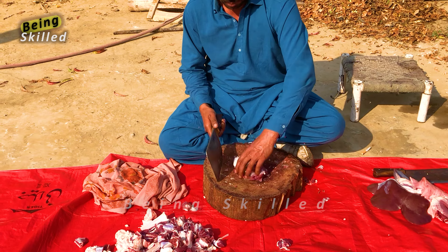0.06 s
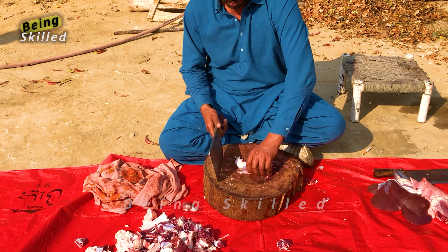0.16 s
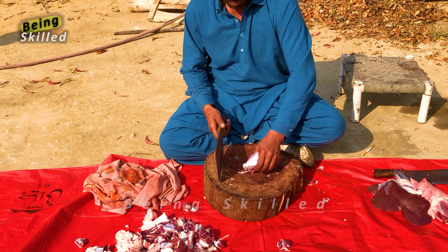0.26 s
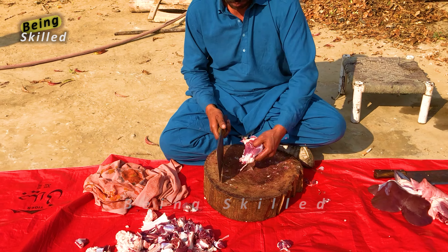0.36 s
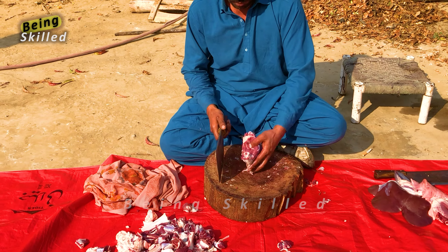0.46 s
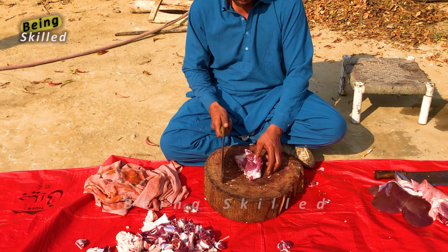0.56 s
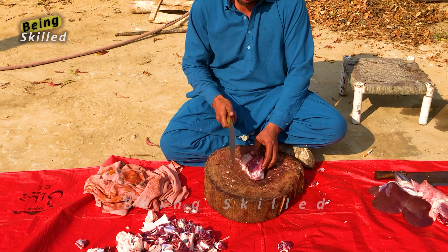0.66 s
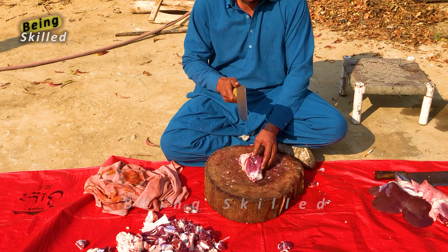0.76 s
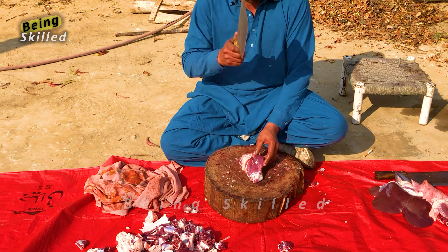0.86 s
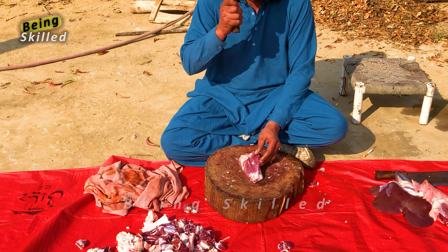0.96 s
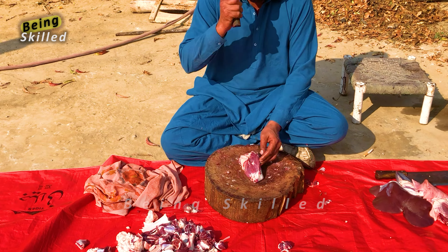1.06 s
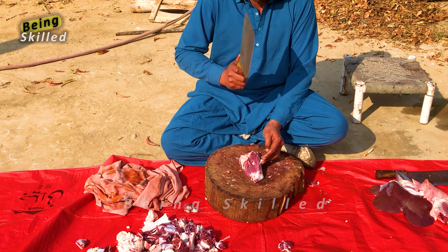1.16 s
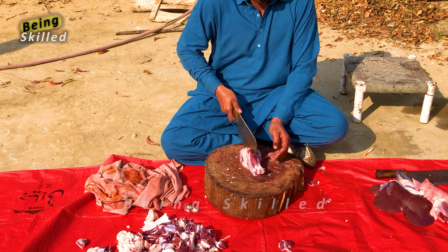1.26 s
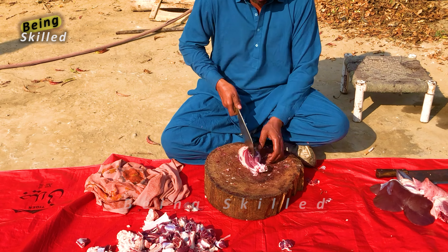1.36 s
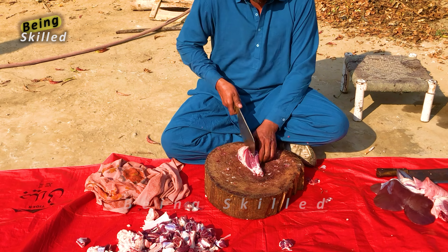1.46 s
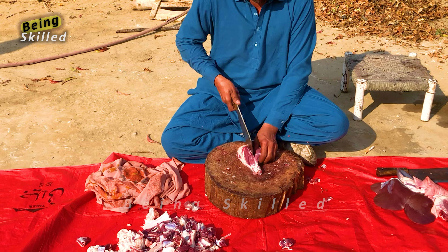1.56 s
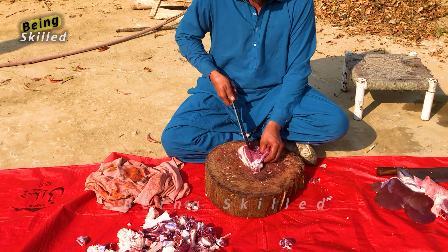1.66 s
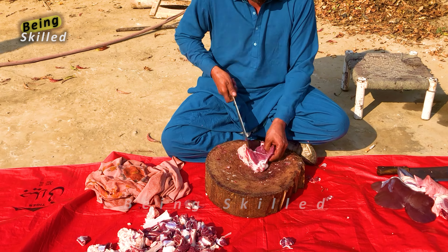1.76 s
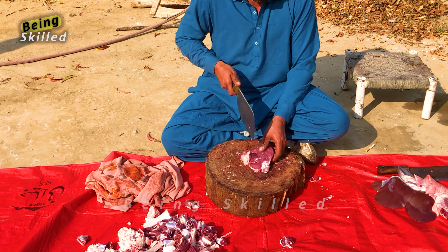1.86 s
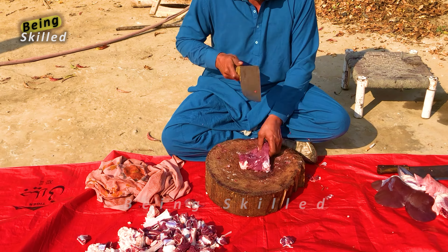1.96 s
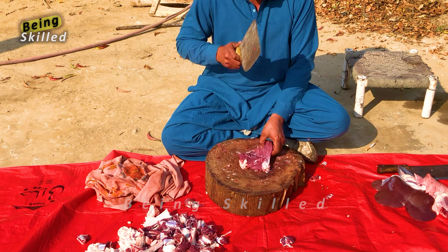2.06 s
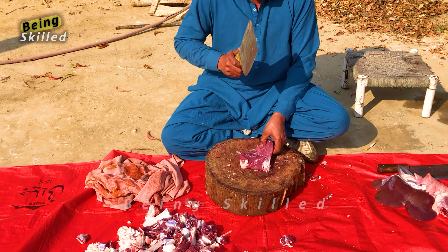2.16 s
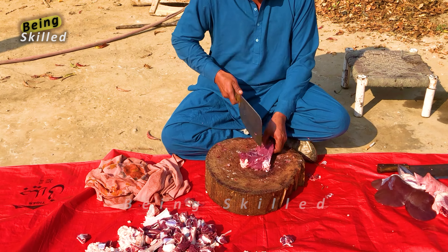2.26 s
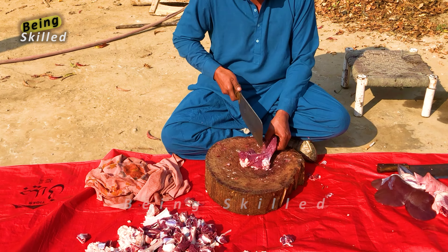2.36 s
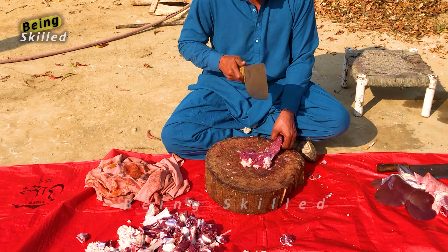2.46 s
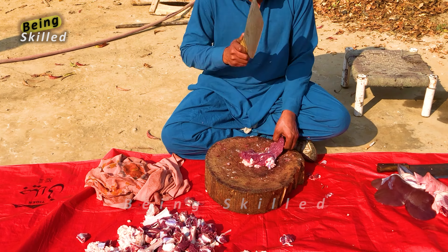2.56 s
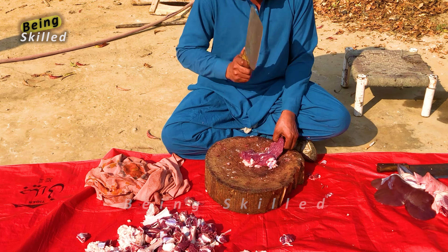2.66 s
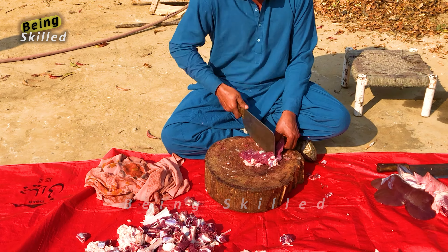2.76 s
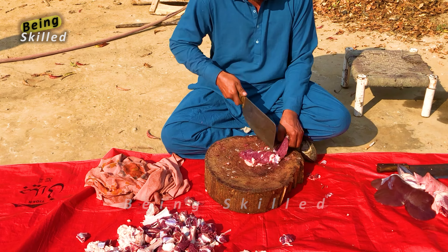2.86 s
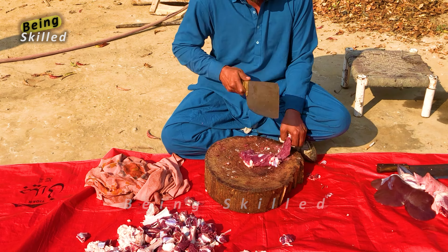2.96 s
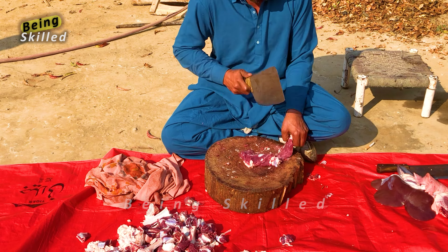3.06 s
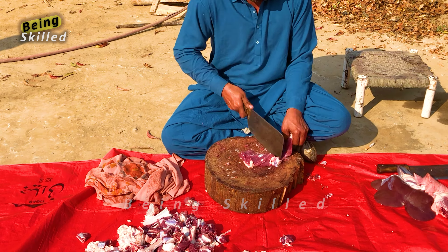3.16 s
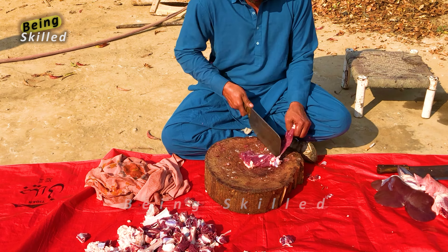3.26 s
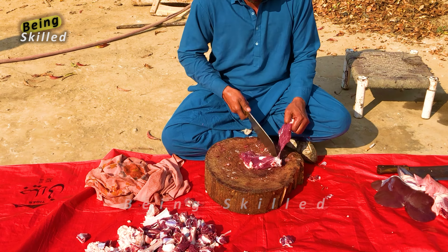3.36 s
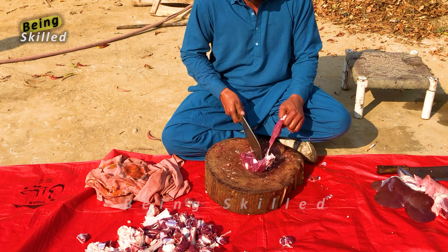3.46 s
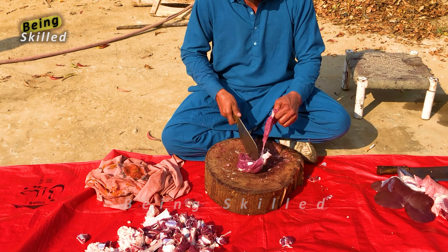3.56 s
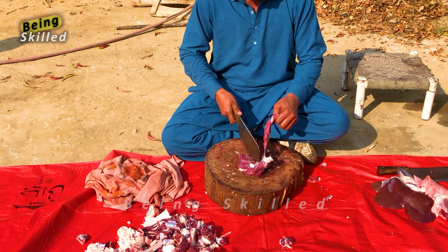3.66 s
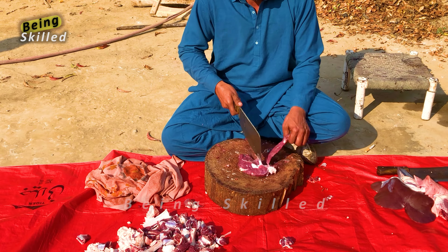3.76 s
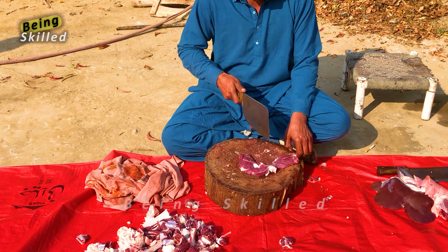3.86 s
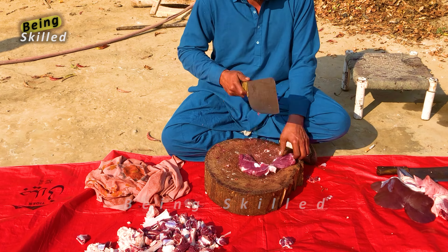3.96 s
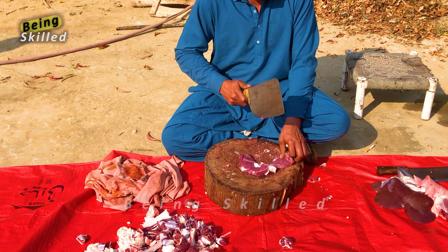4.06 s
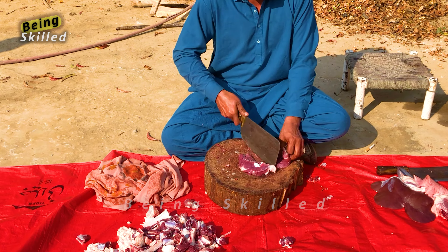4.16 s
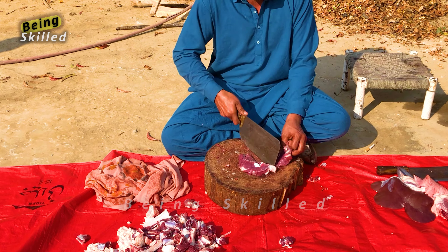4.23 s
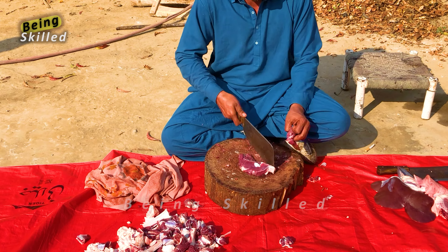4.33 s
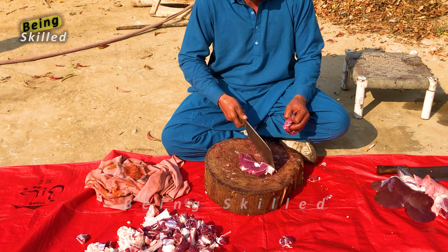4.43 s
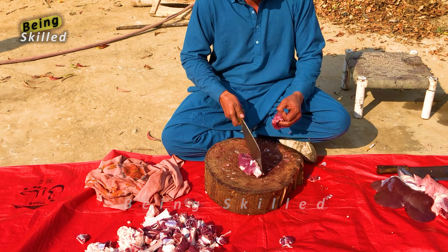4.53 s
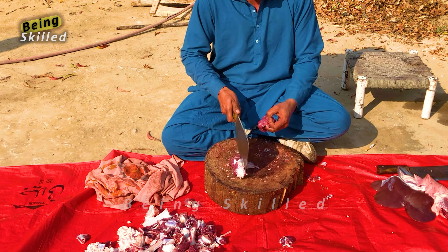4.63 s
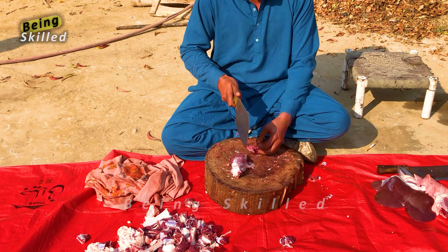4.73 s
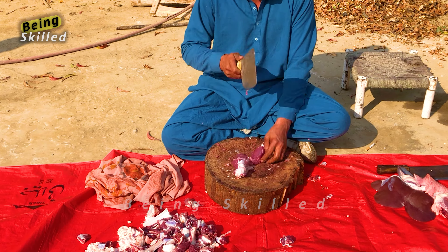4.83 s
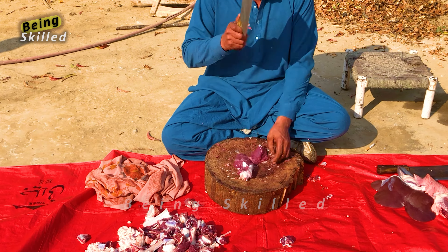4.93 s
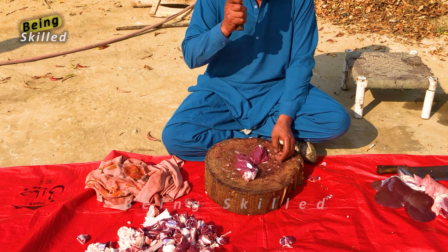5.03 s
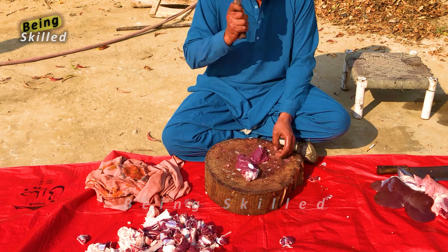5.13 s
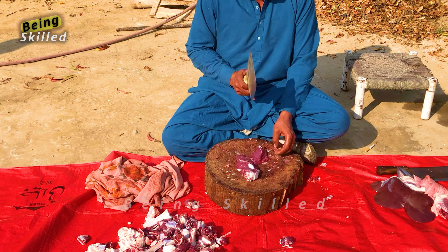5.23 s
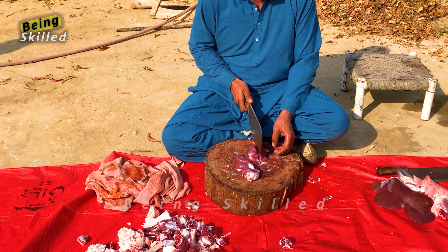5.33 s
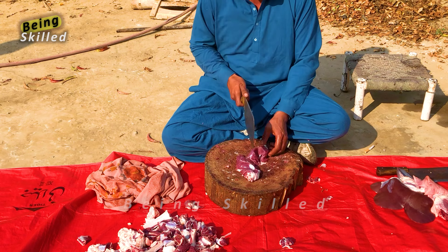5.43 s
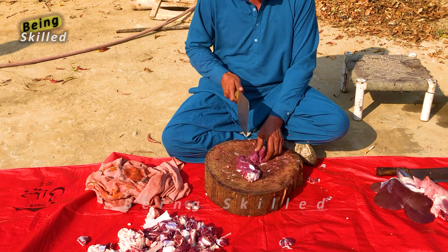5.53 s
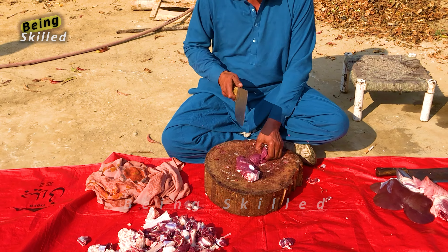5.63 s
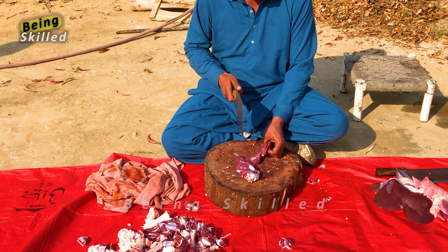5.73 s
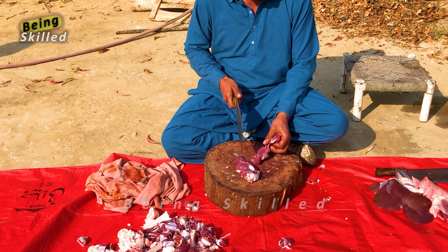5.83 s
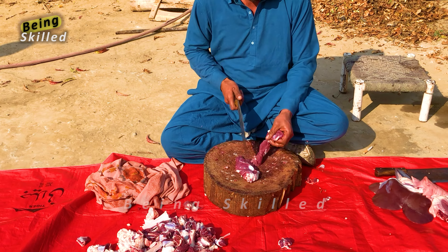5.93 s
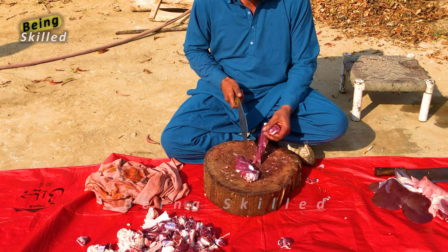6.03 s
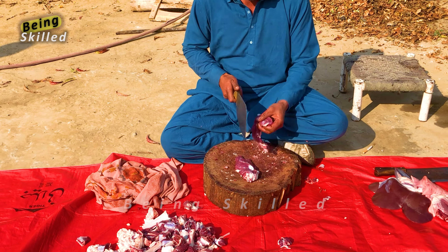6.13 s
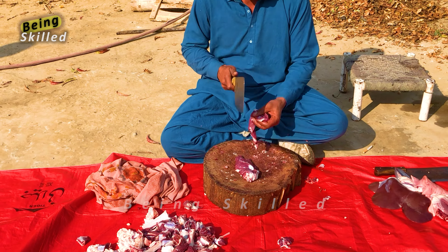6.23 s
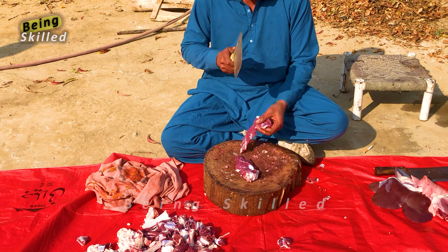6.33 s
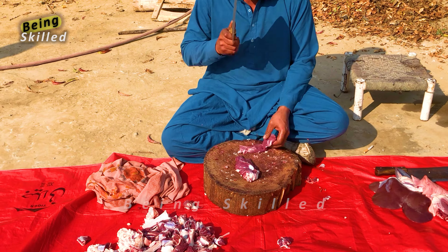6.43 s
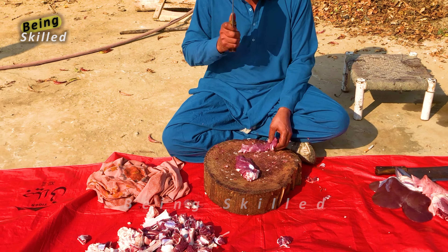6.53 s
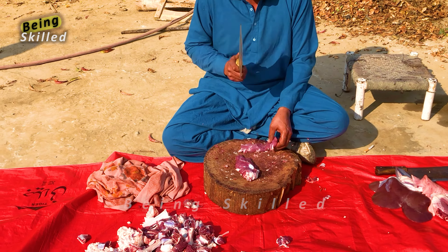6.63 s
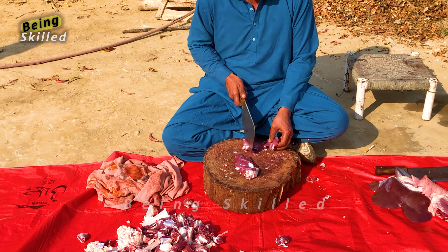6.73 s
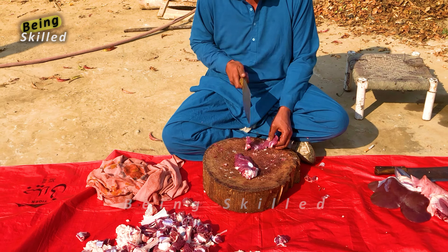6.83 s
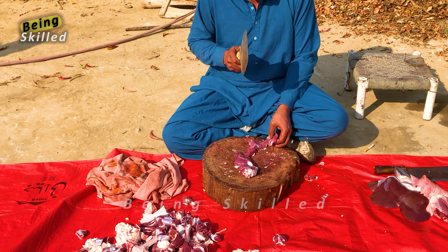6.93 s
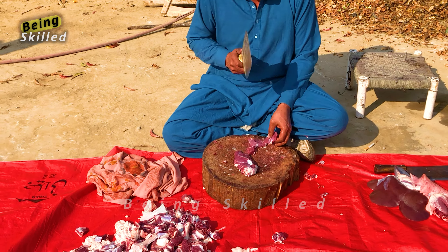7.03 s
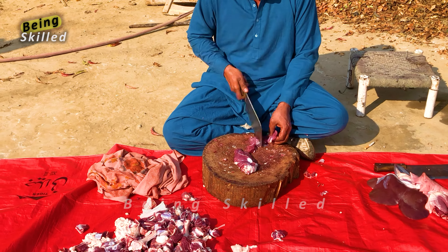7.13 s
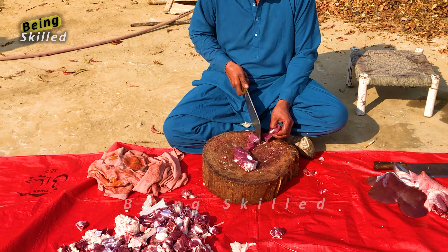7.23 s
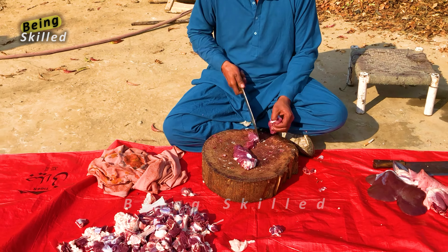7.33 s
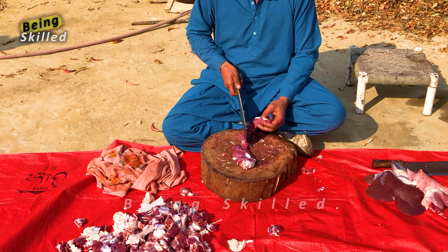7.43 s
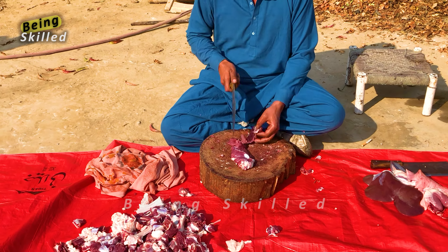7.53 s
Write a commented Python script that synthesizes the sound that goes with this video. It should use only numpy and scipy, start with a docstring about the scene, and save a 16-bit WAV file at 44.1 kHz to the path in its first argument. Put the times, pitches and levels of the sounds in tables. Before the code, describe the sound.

A cleaver strikes meat and bone on a wooden block in sharp, irregular chops, with wet handling sounds and slapping yard echoes outdoors.

```python
"""Distant traffic rumbles throughout as coloured noise, while wet meat clicks and rustles as noise grains.
Drags set the wood ringing, slides and short ticks hiss, and a far bird whistles faintly in gliding sines.
Among these, from 1.27 s on, a cleaver chops meat and bone on a round wooden block in a walled yard:
each blow knocks the block's modes, cracks as shaped noise, sets the blade's modes ringing and comes
back from the walls."""
import sys
import numpy as np
from scipy import signal
from scipy.fft import rfft, irfft
from scipy.io import wavfile
from scipy.ndimage import uniform_filter1d, minimum_filter1d

SR = 44100
rng = np.random.default_rng(int(sys.argv[2]) if len(sys.argv) > 2 else 0)


def persist_wave(psi):
    """Save psi, clipped to +-1, as 16-bit WAV."""
    counts = np.round(np.clip(psi, -1, 1) * 32767).astype(np.int16)
    wavfile.write(sys.argv[1], SR, np.atleast_2d(counts).T)


N = 334719   # length in samples

# Traffic and open air. Each row: frequency in Hz, spectral level in dB per Hz.
AIR_SPECTRUM = [(15, -24.5), (25, -9), (60, 3.5), (138, 6), (238, -4.5), (584, -13), (669, -12),
                (746, -9.5), (1090, -14), (1930, -26.5), (4860, -45.5), (9330, -42.5), (16500, -60)]
AIR_DB = -68

# Faint whistles. Each row: start in seconds, end in seconds, first and last frequency in Hz, level in dB.
WHISTLE_GLIDES = [(1.12, 1.19, 2440, 2360, -79), (1.884, 2.026, 4180, 3900, -84),
                  (1.922, 1.97, 3900, 3300, -79), (1.95, 2.1, 3320, 3250, -79),
                  (1.964, 2.084, 3650, 3500, -78), (1.946, 1.982, 1830, 2080, -78),
                  (1.97, 2.282, 2445, 2450, -73.5), (2.03, 2.134, 2640, 2530, -71),
                  (2.107, 2.315, 1394, 1260, -78), (3.57, 3.65, 2300, 1870, -73),
                  (3.798, 4.165, 3000, 2870, -82), (4.466, 4.85, 2950, 2930, -87),
                  (4.898, 5.31, 2950, 2930, -84)]

# Rustle of the meat in the fingers. Each row: time in seconds, level in dB, level of its treble in dB.
HAND_LEVELS = [(0.0, -83.5, -86.5), (0.51, -75.5, -78.5), (0.99, -81.5, -82.5), (1.31, -75, -87),
               (1.41, -77, -79), (1.79, -75.5, -81.5), (1.96, -76.5, -84.5), (2.13, -77, -80),
               (2.37, -80.5, -100), (2.49, -75.5, -79), (2.64, -80, -84), (3.15, -79.5, -83.5),
               (3.55, -78, -83.5), (3.76, -74, -80), (3.93, -83, -94), (4.16, -85.5, -92),
               (4.63, -76.5, -78), (4.84, -81.5, -83), (5.33, -77, -85), (5.56, -78.5, -84),
               (5.84, -75, -82), (6.02, -84, -90), (6.36, -94, -111), (6.79, -75, -85.5), (6.96, -105, -95),
               (7.59, -84.5, -88.5)]
# Colour of the rustle. Each row: frequency in Hz, spectral level in dB per Hz.
RUSTLE_SPECTRUM = [(710, -22.5), (1200, 0.5), (1560, -6), (2890, -8.5), (4050, -8.5), (5220, -12),
                   (8730, -16.5), (10600, -16), (15100, -15), (16500, -23)]
RUSTLE_SWELL_DB = 2.0   # the fingers work in uneven pushes

# Meat dragged over the block. Each row: start in seconds, hold in seconds, release in seconds, level in dB.
DRAG_STROKES = [(0.488, 0.018, 0.036, -72), (0.605, 0.1, .05, -69.5), (0.798, 0.082, 0.092, -67.5),
                (1.165, 0.12, .03, -80.5)]
DRAG_ATTACK_S = 0.013

# Hissing slides of blade or meat, and short ticks just before or after some blows.
# Each row: start in seconds, level in dB, decay in ms, nominal pitch in Hz.
SLIDE_AND_TICK_EVENTS = [(0.171, -70, 57, 3560), (0.61, -68.5, 85, 2960), (0.819, -66, 58, 2000),
                         (1.169, -75, 38, 2500), (2.857, -50.5, 18, 4970), (3.845, -64.5, 17, 5960),
                         (4.976, -70.5, 140, 4900), (5.087, -71, 18, 6000), (5.294, -47, 1.7, 1120),
                         (5.987, -57, 16, 3970), (6.301, -68.5, 73, 4550), (6.638, -72.5, 15, 3470),
                         (6.722, -52, 6.4, 1790), (6.737, -55, 2.5, 4500), (6.801, -62.5, 22, 3970),
                         (7.225, -36.5, 1.55, 2780)]

# Clearest clicks of wet meat and bone chips, and of the cleaver rebounding on the block some 50 ms after a
# blow. Each row: time in seconds, peak in dB, nominal pitch in Hz, bright snap in dB re the peak, knock on the
# block in dB re the peak.
CLICK_EVENTS = [(0.0766, -59, 6540, -15, -10), (0.0961, -54.5, 2900, 2, 15), (0.267, -56, 3200, -24, -17),
                (0.3407, -54.5, 3600, 0, -5), (0.379, -59, 2390, -14, -10), (0.41, -54, 4010, -22, -4),
                (0.5392, -57.5, 3390, -6, -16), (0.5738, -52, 2980, 5, -25), (0.633, -54, 2200, -16, -8),
                (0.7338, -52, 2660, -29, 0), (0.8513, -58, 2100, 5, -13), (1.0744, -55, 2380, -22, -18),
                (1.1167, -61.5, 2780, 5, -14), (1.1854, -59, 2000, -16, -10),
                (1.6087, -52.5, 4160, -19, -11), (2.8663, -45, 2090, 6, 4), (3.298, -58, 2020, 6.5, -3),
                (3.364, -57, 2580, -22, -10), (3.454, -52.5, 3480, -22, -10),
                (3.4832, -57.5, 2550, -25, -12), (3.574, -59.5, 3380, -20, -14),
                (3.652, -63, 2900, -20, -9), (3.8137, -57.5, 2580, -13, -16), (3.8542, -53, 3880, 6.5, -6),
                (3.9465, -59.5, 2200, -19, 2), (4.2634, -55.5, 2070, 0, -6), (4.3869, -64, 3460, -22, -13),
                (4.4479, -51.5, 2780, -21, -8), (4.7824, -56.5, 2890, -5, -29), (4.9891, -53, 4570, 2, -25),
                (4.9933, -41.5, 2970, -1, -21), (5.014, -47.5, 2320, -6, -12), (5.0848, -50, 3240, -3, -16),
                (5.0947, -47, 3200, 0, -15), (5.117, -60, 4160, 8, 2), (5.1294, -47.5, 2480, 4, -7),
                (5.1487, -53, 3900, 1, -7), (5.193, -63, 2920, -18, -16), (5.5048, -55, 3920, -19, -6),
                (5.5628, -56, 3230, -7, 2), (5.5796, -49.5, 2800, -5, -17), (5.6293, -53, 3140, -23, -13),
                (5.6434, -64, 2440, -19, 0), (5.708, -48, 2420, -15, -19), (5.758, -58, 3000, -13, 1),
                (5.7954, -54.5, 2720, 0, -15), (5.8596, -57, 3040, -22, -4), (5.882, -56, 2900, -21, -10),
                (5.9034, -64, 2000, -12, -8), (5.9266, -62, 2060, -16, -1), (5.9905, -46, 2730, -9, -7),
                (6.3016, -56.5, 4840, 3.5, -23), (6.4872, -68, 2160, -25, -7), (6.564, -66, 3610, -28, -12),
                (6.5963, -64, 2790, -2, -15), (6.6174, -65, 3250, -22, -5), (6.8132, -49, 3350, -23, 21),
                (7.0095, -54, 3670, -30, 0), (7.3472, -57, 4790, -32, -11)]
CLICK_MS = 1.55   # decay time constant
# Fainter random ticks: number, peak in dB re the rustle, scale of the peaks' spread, range of pitches.
TICK_COUNT, TICK_DB, TICK_SPREAD_DB = 90, 11, 2.0
TICK_LOW_HZ, TICK_HIGH_HZ = 2200, 5000
TICK_SNAP_DB, TICK_KNOCK_DB = -15.5, -12   # both re the tick's peak
BLADE_TOUCH_S, BLADE_TOUCH_DB = 3.455, -62   # a light touch rings one pair of blade modes

# Modes of the wooden block, the first three being the thud.
# Each row: frequency in Hz, level in dB, 60 dB decay time in seconds.
BLOCK_MODES = [(351.5, -39, 0.04), (490, -10, 0.13), (598.7, 8.5, 0.023), (868, -16.5, 0.049),
               (1028, -1, 0.011), (1193, 11.5, 0.012), (1418, 4, 0.015), (1846, -17.5, 0.03)]
THUD_MODES = 3
# The block pushes on the ground. Each row: frequency in Hz, level in dB re the knock, 60 dB decay in seconds.
GROUND_MODES = [(71.3, -39.5, 0.23), (126, -33.5, 0.096), (193, -28, 0.049)]
LOW_CUT_HZ = 270   # a small block sends out little bass

# Modes of the freely held blade, some in close pairs that beat.
# Each row: frequency in Hz, level in dB, 60 dB decay time in seconds.
BLADE_MODES = [(949, -3, .45), (953, -7, 1.6), (1555, -3, .3), (1558, -27, 1.2), (2304, 0, .3),
               (3388, 0, .25), (3393, -17, .6), (5211, 0, .13), (5206, -30, .8), (6563, -3, .12),
               (6560, -30, .6), (8208, -12, .07)]
HIGH_MODES_LAST = 1.7   # factor on the free ringing time above 2 kHz

# Colour of the crack. Each row: frequency in Hz, spectral level in dB per Hz.
CRACK_SPECTRUM = [(1060, -27), (1800, -14.5), (1990, 15.5), (2230, -10.5), (2540, 7), (3960, 3), (4990, -7),
                  (6710, -3.5), (10700, -17), (15000, -10), (16500, -18)]
LEAD_S = .008   # the crack's noise begins this long before its burst

# Wall echoes. Each row: delay in seconds, level in dB re the yard.
WALL_ECHOES = [(.040, 14.5), (.062, -13), (.081, -11), (.097, 1), (.121, -1.5), (0.147, -12)]
ECHO_CUT_HZ = 750
# Sound scattered in the yard. Each row: frequency in Hz, spectral level in dB per Hz.
YARD_SPECTRUM = [(59, -44), (100, -11.5), (146, -9), (271, -39), (304, -2), (645, 0.5), (994, -8),
                 (1500, -17), (2320, -35.5), (9000, -37), (11700, -77), (19800, -120)]
# Decay of the scattered sound. Each row: frequency in Hz, 60 dB decay time in seconds.
YARD_DECAY = [(100, 1.2), (300, 1.23), (700, 1.004), (1500, 1.43), (3000, 1.42), (9000, 0.104)]

# Cleaver blows. Each row: time in seconds, knock in dB, thud in dB re the knock, crack in dB re the knock,
# delay of the second contact in ms, its share of the force (0-1.5), pitch factor of the spot struck,
# yard in dB, treble in dB re the crack, hiss of the entering edge in dB re the crack,
# splintering tail in dB re the crack, blade ring in dB under 1.2 kHz, at 1.2-2 kHz, 2-3 kHz, 3-4.5 kHz,
# 4.5-6 kHz and higher, free ringing time in seconds.
CLEAVER_BLOWS = [(1.2684, -17, -10, -13.5, 0.8, 0.41, 0.97, -46.5, 10.5, -20, -40, -70, -75, -80, -76, -85, -85, .02),
                 (2.3306, -18, -7, -2.5, 1.59, 0.7, 1.15, -49, -6, -40.5, -40, -42, -41, -72, -46, -52, -51, 1),
                 (2.8033, -13.5, -3, -6.5, 2.67, 0.3, 0.99, -45.5, 7, -26, -37, -62, -62, -68, -68, -64, -68, .035),
                 (3.2130, -12.5, 4.5, -10, 0.97, 0.78, 1.07, -50.5, 4.5, -32, -37, -52, -62, -70, -66, -56, -55, .03),
                 (4.2090, -13, -5.5, -14.5, 1.13, 0.41, 0.93, -54.5, 5.5, -21, -40, -43, -43, -56, -63, -73, -64, .024),
                 (5.3197, -14, -11, -9, 0.8, 0.41, 1.01, -44, 2.5, -35, -40, -70, -70, -59, -72, -80, -80, .022),
                 (6.7498, -21.5, -3.5, 1, 1.45, 1.5, 0.76, -43.5, -4, -43, -44, -48, -49, -68, -58, -80, -80, .03),
                 (7.1765, -18, -0.5, -12, 0.97, 0.45, 0.9, -47, 0, -23, -40, -55, -46, -72, -72, -80, -72, .028)]

MIC_LOW_CUT_HZ, CUTOFF_HZ = 50, 16750
CEILING = .118   # limiter ceiling, full scale = 1


def from_db(db):
    """A level in decibels is twenty times the logarithm of the amplitude; this inverts it."""
    return 10 ** (np.asarray(db) / 20)


def rms_one(x):
    """Division by the root mean square gives a signal unit effective value."""
    return x / np.sqrt(np.mean(x ** 2) + 1e-20)


def at_hz(points, hz):
    """Values between table points follow straight lines on a logarithmic frequency axis."""
    table = np.array(points)
    return np.interp(np.log(hz), np.log(table[:, 0]), table[:, 1])


def coloured(x, spectrum):
    """Linear filtering multiplies each spectral component by the gain at its frequency."""
    hz = np.maximum(np.arange(len(x) // 2 + 1) * SR / len(x), 1)
    return irfft(rfft(x) * from_db(at_hz(spectrum, hz)), len(x))


def bandpass(x, order, low_hz, high_hz):
    """A band-pass filter passes the components between two cutoff frequencies."""
    sos = signal.butter(order, [low_hz, high_hz], "band", fs=SR, output="sos")
    return signal.sosfilt(sos, x)


def drift(rate):
    """Random knots, rate per second and of spread 1, joined by lines form a slow fluctuation."""
    knots = rng.standard_normal(int(N / SR * rate) + 2)
    return np.interp(np.arange(N) * rate / SR, np.arange(len(knots)), knots)


def add(out, s, sound):
    """Sounds superpose linearly: one is summed into the mix at a time in seconds."""
    at = round(s * SR)
    out[at:at + len(sound)] += sound[:N - at]


def ringing(modes, size, extra_db=0, damping=1):
    """A struck body rings as a sum of sines, each dying exponentially; damping scales the decay times."""
    t = np.arange(size) / SR
    hz, db, t60 = np.transpose(modes)[:, :, None]
    level_db = db + extra_db - 60 * t / (t60 * damping)
    return np.sum(from_db(level_db) * np.sin(2 * np.pi * hz * t), axis=0)


def air():
    """Many distant sources add to steady coloured noise: far traffic and open air, gently swelling."""
    noise = rms_one(coloured(rng.standard_normal(N), AIR_SPECTRUM))
    return from_db(AIR_DB + .8 * drift(3)) * noise


def whistles():
    """A tone's phase is the integral of its frequency: thin glides, wavering and blurred by distance."""
    out, waver = np.zeros(N), 1 + .012 * drift(120)
    for start, end, hz_from, hz_to, db in WHISTLE_GLIDES:
        size = int((end - start) * SR)
        hz = np.linspace(hz_from, hz_to, size) * waver[int(start * SR):][:size]
        tone = np.sin(2 * np.pi * np.cumsum(hz) / SR)
        envelope = signal.windows.tukey(size, .4) * np.linspace(1, .4, size)
        add(out, start, from_db(db) * tone * envelope)
    # many paths add and cancel
    return out * (1 + .45 * drift(150))


def hands_levels():
    """Level contours, linear in dB between table times, of the rustle and of its treble."""
    s, rustle_db, treble_db = np.transpose(HAND_LEVELS)
    t = np.arange(N) / SR
    return np.interp(t, s, rustle_db), np.interp(t, s, treble_db)


def hands():
    """Sticky surfaces part in clumps of random impulses, heard as tiny grains over a soft noise rustle."""
    rustle_db, treble_db = hands_levels()
    born = rng.random(N) < 500 * from_db(6.0 * drift(25)) / SR
    size_db = 11.0 * np.minimum(rng.exponential(1, N), 4)
    sizes = from_db(size_db) * rng.choice([-1, 1], N)
    grains = 0.23 * rms_one(born * sizes)
    soft = rng.standard_normal(N) * from_db(3.5 * drift(45))
    rustle = coloured(grains + soft, RUSTLE_SPECTRUM) * from_db(RUSTLE_SWELL_DB * drift(9))
    low = rms_one(signal.sosfilt(signal.butter(3, 7000, "low", fs=SR, output="sos"), rustle))
    high = rms_one(signal.sosfilt(signal.butter(3, 7000, "high", fs=SR, output="sos"), rustle))
    return from_db(rustle_db) * low + from_db(treble_db) * high


def drags():
    """Friction acts as random slips exciting the wood's modes; each drag swells in, holds and fades."""
    t = np.arange(N) / SR
    slipping = rng.random(N) < 400 * from_db(5.0 * drift(30)) / SR
    slips = slipping * rng.standard_normal(N)
    wood = ringing(BLOCK_MODES[3:5], 2048, 0, 0.65)
    rub = rms_one(signal.fftconvolve(slips, wood)[:N])
    stroke = np.zeros(N)
    for s, hold_s, release_s, db in DRAG_STROKES:
        attack = np.clip((t - s) / DRAG_ATTACK_S, 0, 1)
        fade = np.exp(-np.maximum(t - s - hold_s, 0) / release_s)
        stroke += from_db(db) * attack * fade
    return stroke * rub


def slides_and_ticks():
    """Band-limited noise that starts at once and dies exponentially is a hiss if slow, a tick if fast."""
    out, t = np.zeros(N), np.arange(SR // 3) / SR
    for s, db, decay_ms, hz in SLIDE_AND_TICK_EVENTS:
        hiss = rms_one(bandpass(rng.standard_normal(len(t)), 1, hz / 2.2, hz * 1.07))
        envelope = t / (t + 0.0023) * np.exp(-t * 1000 / decay_ms)
        add(out, s, from_db(db) * hiss * envelope)
    return out


def faint_ticks():
    """Independent small events fall at random times; their peaks follow the level of the rustle."""
    place, size, pitch = rng.random((TICK_COUNT, 3)).T
    s = .01 + place * (N / SR - .05)
    rustle_db = hands_levels()[0][(s * SR).astype(int)]
    db = rustle_db + TICK_DB - TICK_SPREAD_DB * np.log(size + 0.06)
    hz = TICK_LOW_HZ * (TICK_HIGH_HZ / TICK_LOW_HZ) ** pitch
    return [(*row, TICK_SNAP_DB, TICK_KNOCK_DB) for row in zip(s, db, hz)]


def clicks():
    """A brief force excites a dying noise grain and a bright snap.

    It also knocks the block's modes, mostly faintly, at times louder than the click."""
    out, t = np.zeros(N), np.arange(1024) / SR
    knock = ringing(BLOCK_MODES[2:], len(t))
    bright = signal.butter(3, 7500, "high", fs=SR, output="sos")
    for s, db, hz, snap_db, knock_db in faint_ticks() + list(CLICK_EVENTS):
        burst = rng.standard_normal(len(t)) * np.exp(-t * 1000 / CLICK_MS)
        grain = bandpass(burst, 2, hz / 1.92, hz * 1.42)
        snap = signal.sosfilt(bright, burst)
        parts = np.array([grain, snap, knock])
        gains = from_db([db, db + snap_db, db + knock_db]) / np.abs(parts).max(axis=1)
        add(out, s - .0005, gains @ parts)
    add(out, BLADE_TOUCH_S, ringing(BLADE_MODES[2:4], SR // 5, BLADE_TOUCH_DB))
    return out


def yard_response():
    """Scattered noise decays band by band, lumpy because it returns from many separate surfaces."""
    t = np.arange(SR) / SR
    # ground and near things answer at once, the walls' scattered field takes a while to build up
    near = 3.78 * t / (t + 0.0024) * np.exp(-(t / 0.022) ** 2)
    rise = near + 1 - .85 * np.exp(-(t / .05) ** 4)
    lumps = from_db(2.2 * drift(120)[:SR])
    edges, out = 90 * 2 ** np.arange(0, 7, .5), np.zeros(SR)   # half-octave bands
    for low, high in zip(edges, edges[1:]):
        band = bandpass(rng.standard_normal(SR), 2, low, high)
        hz = np.sqrt(low * high)
        decay_db = at_hz(YARD_SPECTRUM, hz) - 60 * t / at_hz(YARD_DECAY, hz)
        out += band * from_db(decay_db)
    out = out * rise * lumps
    return out / np.sqrt(np.mean(out[:SR // 5] ** 2))


def wall_echo(radiates):
    """Reflection from a rough wall dulls the block's ring and smears it over a few ms; peak 1."""
    smear = rng.standard_normal(420) * np.hanning(420)
    echo = np.convolve(ringing(BLOCK_MODES, 1500, 0, .7), smear)
    dulls = signal.butter(3, ECHO_CUT_HZ, fs=SR, output="sos")
    echo = signal.sosfilt(np.vstack([radiates, dulls]), echo)
    return echo / np.abs(echo).max()


def contact(t, s, width_s=0.0001):
    """An elastic contact delivers a short smooth push, here a Gaussian pulse of force."""
    return np.exp(-((t - s) / width_s) ** 2)


def crack(treble_db, entry_db, tail_db):
    """Fracture radiates noise: fibres hiss for a few ms as the edge enters, then bone and wood splinter."""
    t = np.arange(6000) / SR - LEAD_S
    noise = rms_one(coloured(rng.standard_normal(len(t)), CRACK_SPECTRUM))
    treble = signal.sosfilt(signal.butter(2, 7000, "high", fs=SR, output="sos"), noise)
    noise = noise + (from_db(treble_db) - 1) * treble
    after = np.maximum(t, 0)
    decay = np.exp(-after / 0.0014) + from_db(tail_db) * np.exp(-after / 0.035)
    burst = after / (after + 0.00063) * decay
    entry = from_db(entry_db) * np.exp(-np.abs(t) / 0.0014)
    return noise * (burst + entry)


def blade(levels_db, free_s, size):
    """A plate's modes ring freely until meat or grip damps them, the low modes first."""
    hz = np.array(BLADE_MODES)[:, 0]
    group = np.searchsorted([1200, 2000, 3000, 4500, 6000], hz)
    free = free_s * np.where(hz > 2000, HIGH_MODES_LAST, 1)[:, None]
    stop_db = -9 * np.minimum(np.arange(size) / SR / free, 3) ** 4
    return ringing(BLADE_MODES, size, np.array(levels_db)[group, None] + stop_db)


def block_knock(force, pitch, thud_db, radiates):
    """A body's response is the contact force convolved with its modal impulse response; peak 1."""
    is_thud = (np.arange(len(BLOCK_MODES)) < THUD_MODES)[:, None]
    spot_db = is_thud * thud_db + rng.normal(0, 1.2, (len(BLOCK_MODES), 1))
    modes = np.array(BLOCK_MODES) * [pitch, 1, 1]
    knock = np.convolve(force, ringing(modes, len(force), spot_db))[:len(force)]
    knock = signal.sosfilt(radiates, knock)
    return knock / np.abs(knock).max()


def blows():
    """Impact excites every body in contact: the edge bites the meat, stops on bone or wood, strikes again."""
    out, yard = np.zeros(N), yard_response()
    t, bite_s = np.arange(2048) / SR, .0012
    ends = [row[0] for row in CLEAVER_BLOWS[1:]] + [N / SR]   # the next blow stops the ring
    radiates = signal.butter(2, LOW_CUT_HZ, "high", fs=SR, output="sos")
    for row, end in zip(CLEAVER_BLOWS, ends):
        s, knock_db, thud_db, crack_db, again_ms, share, pitch, yard_db = row[:8]
        treble_db, entry_db, tail_db, *ring_db, free_s = row[8:]
        first = 0.13 * contact(t, 0) + contact(t, bite_s)
        force = first + share * contact(t, bite_s + again_ms / 1000)
        add(out, s - bite_s, from_db(knock_db) * block_knock(force, pitch, thud_db, radiates))
        ground_db = rng.normal(0, 2, (len(GROUND_MODES), 1))
        add(out, s, from_db(knock_db) * ringing(GROUND_MODES, SR // 5, ground_db))
        for delay_s, db in WALL_ECHOES:
            add(out, s + delay_s, from_db(yard_db + db) * wall_echo(radiates))
        splitting = crack(treble_db, entry_db, tail_db)
        add(out, s - bite_s - LEAD_S, from_db(knock_db + crack_db) * splitting)
        add(out, s, blade(ring_db, free_s, int((end - s) * SR)))
        # every blow lands elsewhere, so part of the yard's answer is new
        add(out, s, from_db(yard_db) * (0.33 * yard + 0.79 * yard_response()))
    return out


def scene():
    """Sound pressures superpose: all sources are summed into one channel."""
    background = air() + whistles()
    handling = hands() + drags() + slides_and_ticks() + clicks()
    return (background + handling + blows())[None]


def record(dry):
    """The microphone drops the deep bass, a fast limiter holds peaks at the ceiling, the top is cut."""
    heard = signal.sosfilt(signal.butter(3, MIC_LOW_CUT_HZ, "high", fs=SR, output="sos"), dry)
    allowed = minimum_filter1d(np.minimum(1, CEILING / (np.abs(heard) + 1e-9)), size=61)
    limited = heard * uniform_filter1d(allowed, size=31)
    return signal.sosfilt(signal.cheby2(12, 60, CUTOFF_HZ, fs=SR, output="sos"), limited)


dry = scene()
out = record(dry)
persist_wave(out)
```